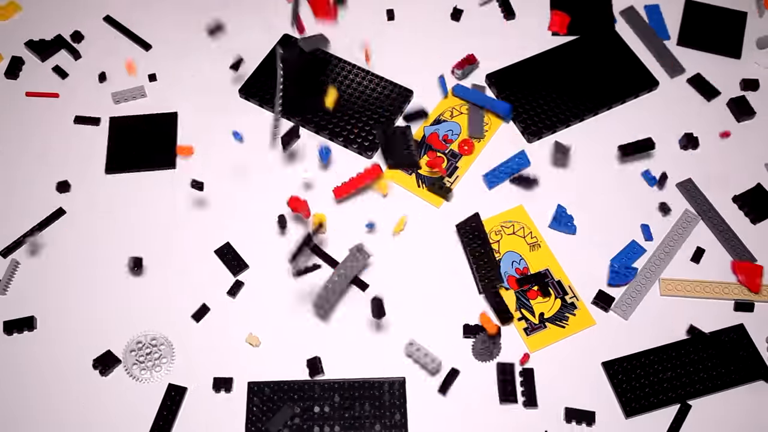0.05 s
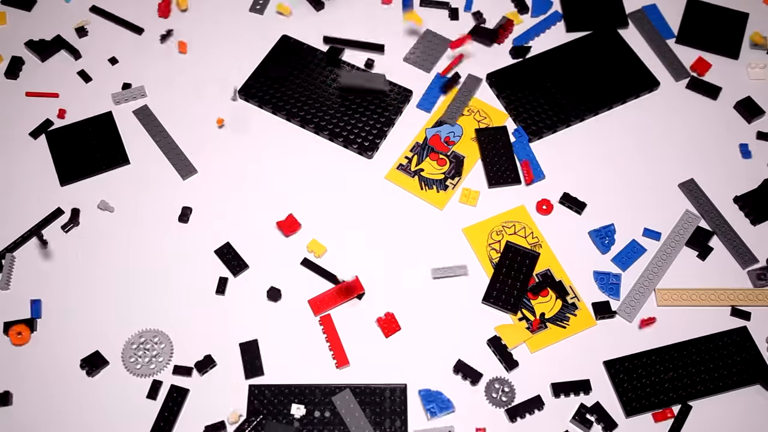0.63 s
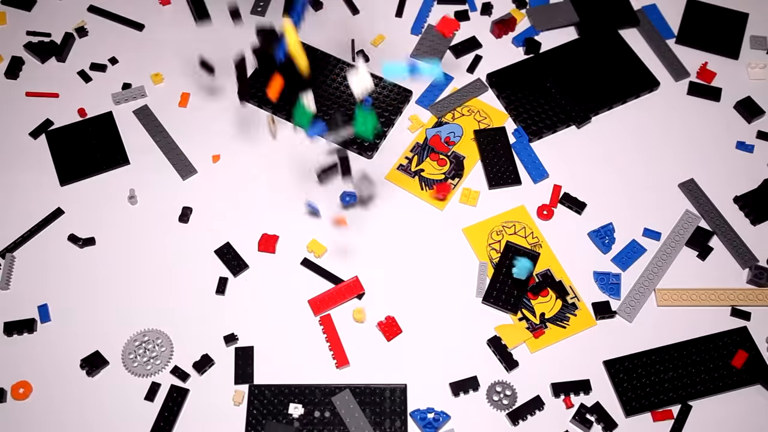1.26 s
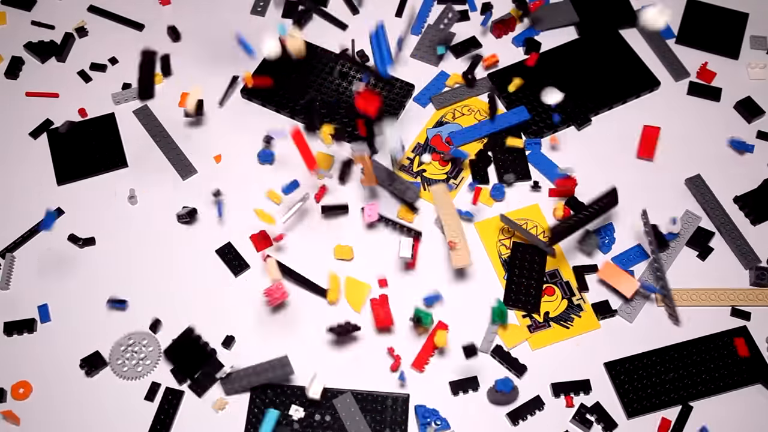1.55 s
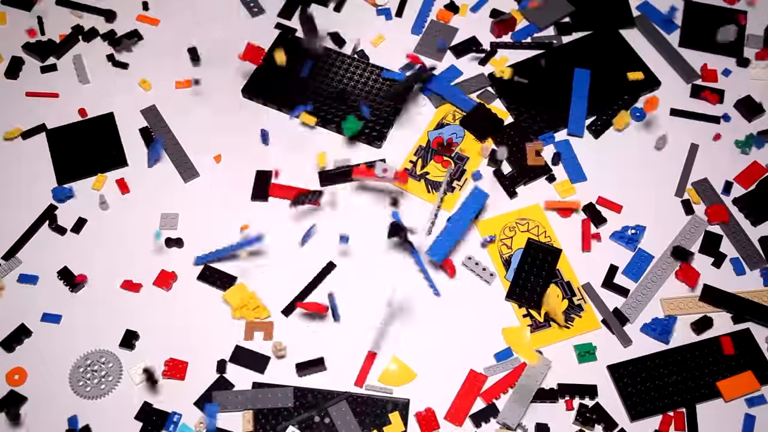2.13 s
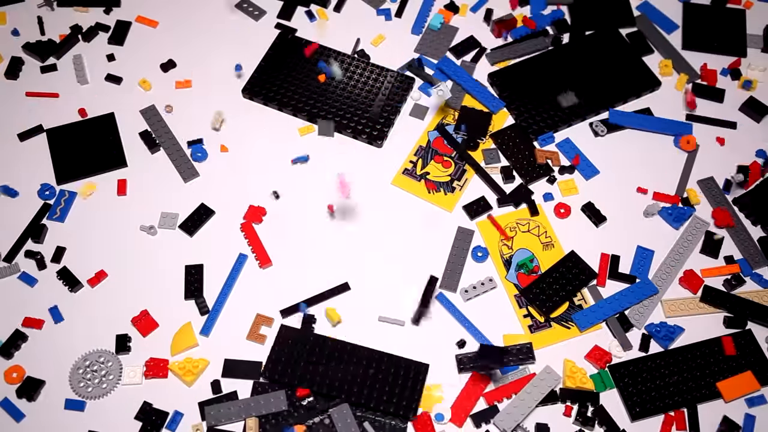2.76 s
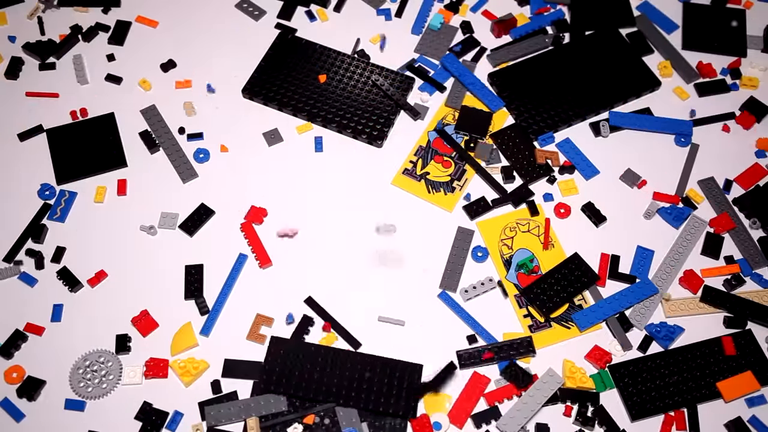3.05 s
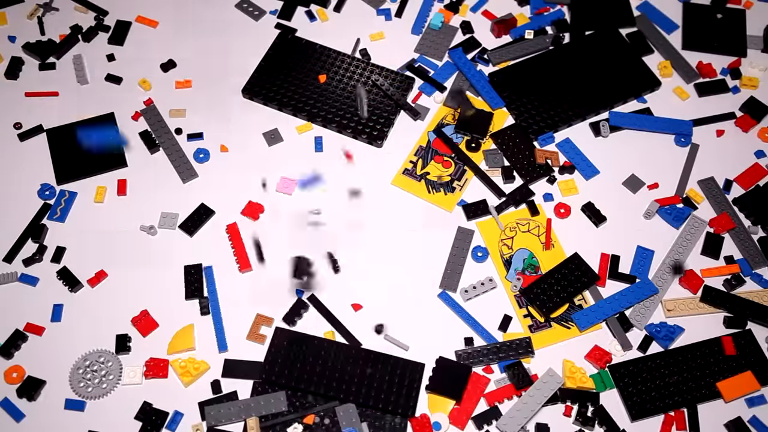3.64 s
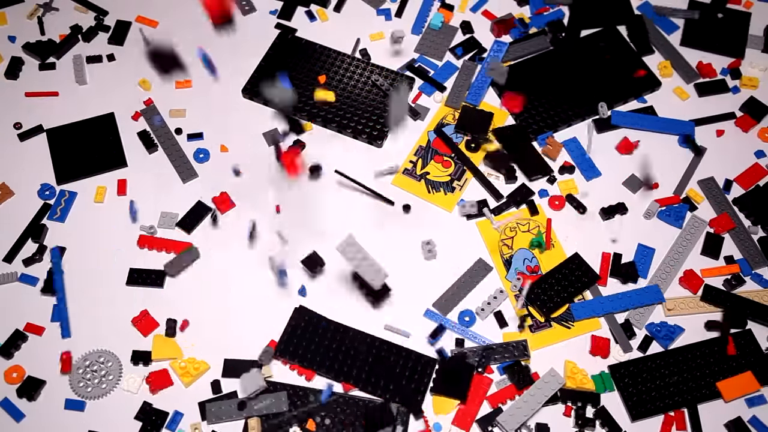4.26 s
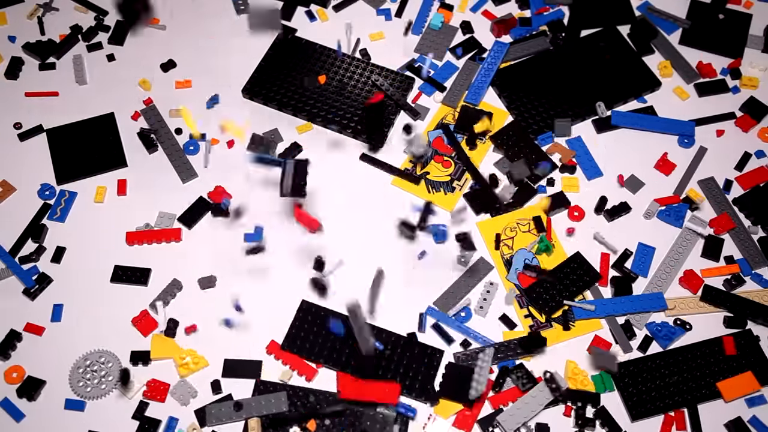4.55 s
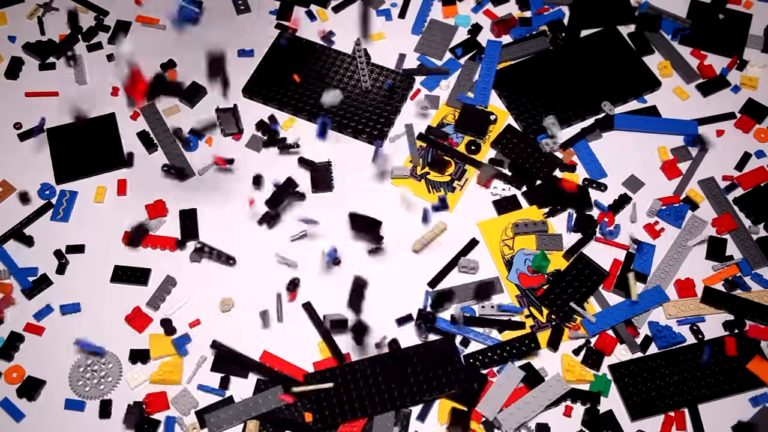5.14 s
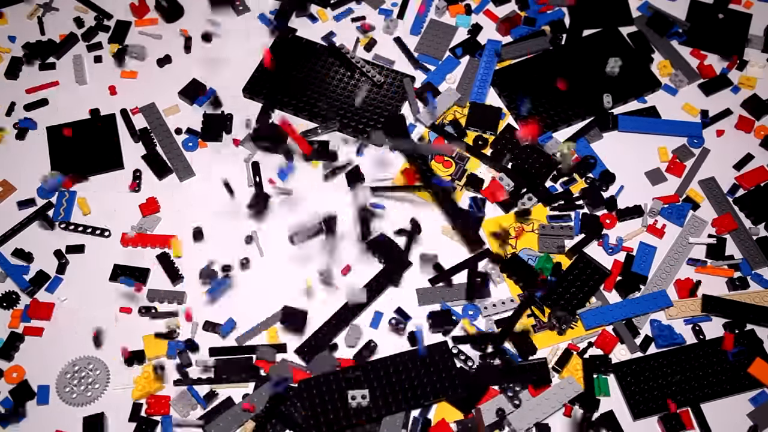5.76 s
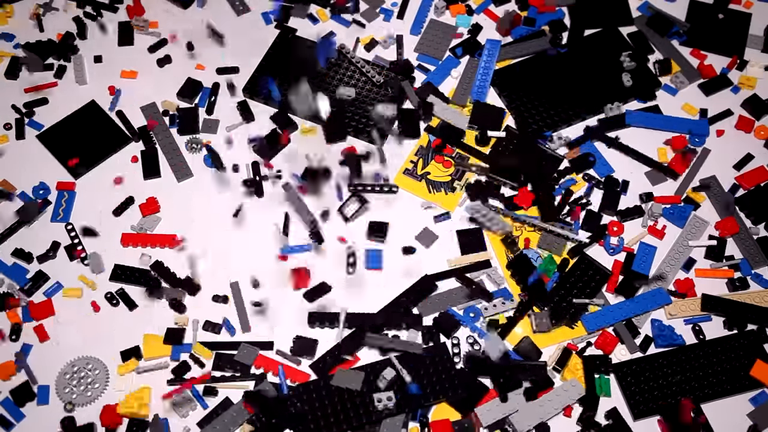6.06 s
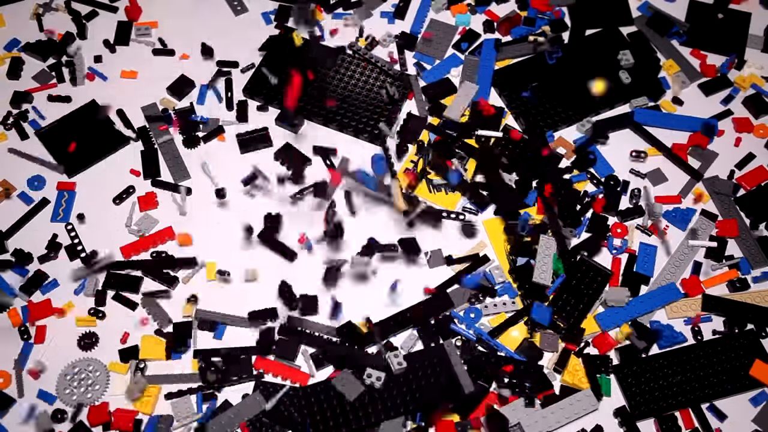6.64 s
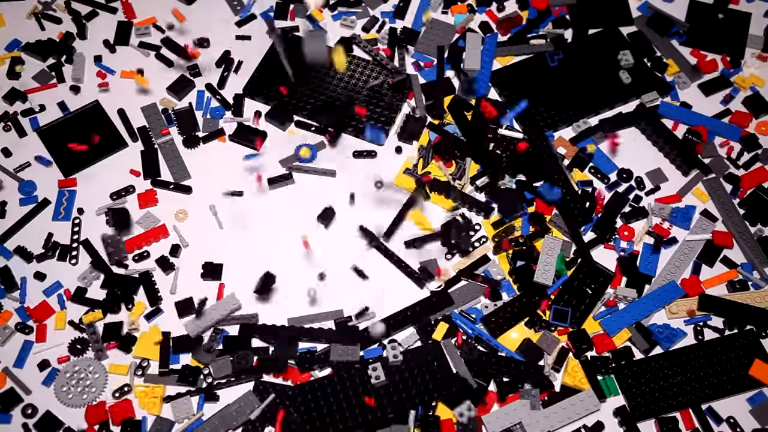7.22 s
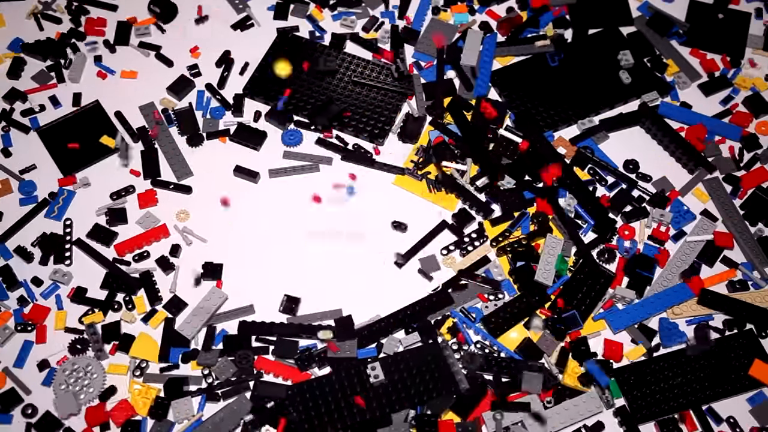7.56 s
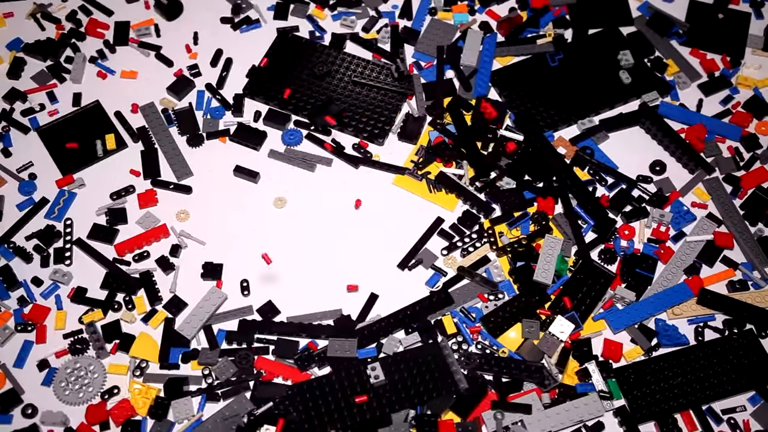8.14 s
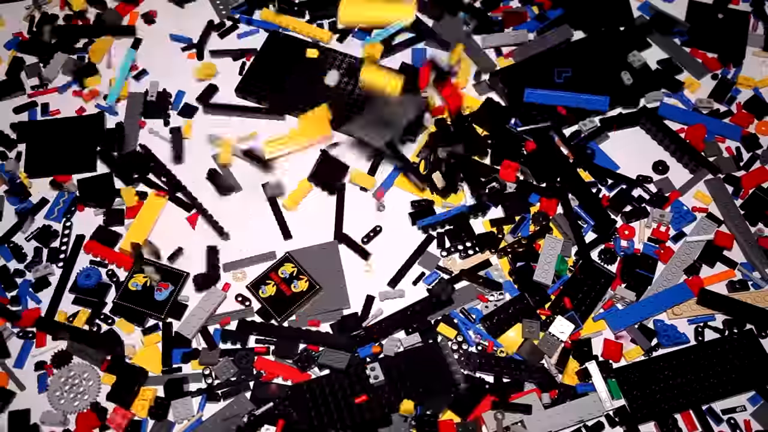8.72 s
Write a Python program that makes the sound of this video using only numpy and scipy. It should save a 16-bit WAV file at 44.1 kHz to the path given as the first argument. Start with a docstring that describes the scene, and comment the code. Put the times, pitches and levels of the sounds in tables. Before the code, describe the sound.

Four pours of loose plastic building bricks hit a tabletop, heard up close with a little small-room echo. The first is brief, followed by a soft slide of bricks in a tub. The second starts suddenly and trails off into single clicks. The third grows from a trickle into a long, dense clatter and dies down. The fourth is short and loud. Sharp pings and hollow knocks from larger plates stand out throughout.

```python
"""Loose plastic toy bricks are tipped onto a table in four pours, close by, in a small room.
A short pour opens: pieces click and tap, big plates knock; the taps set off table top ring and
a low room hum. At 0.8 s bricks slide in their tub, further off. The second pour follows at 1.3 s,
and a few pieces bounce on the spot. The third builds slowly from 3.5 s, sags and settles after
7.2 s. A last brief, loud pour lands at 8.2 s."""
import sys
import numpy as np
from scipy import signal
from scipy.fft import rfft, irfft, next_fast_len
from scipy.io import wavfile

SR = 44100
rng = np.random.default_rng(int(sys.argv[2]) if len(sys.argv) > 2 else 0)


def file_out(sig):
    """Save sig as 16-bit WAV at sys.argv[1]."""
    # one column per channel
    cols = np.atleast_2d(sig).T
    # limit, then scale
    lim = np.clip(cols, -1, 1)
    pcm = np.round(lim * 32767).astype(np.int16)
    wavfile.write(sys.argv[1], SR, pcm)


N = 387638
T = np.arange(3072) / SR  # life of one contact [s]


def amp(db):
    """Decibels to gain."""
    return 10 ** (np.asarray(db) / 20)


def norm(x):
    """Scale to unit energy."""
    return x / np.sqrt(np.sum(x ** 2) + 1e-20)


def along(points, hz):
    """Interpolate (frequency, value) points on a log axis."""
    freqs, values = np.transpose(points)
    return np.interp(np.log(hz + 1), np.log(freqs + 1), values)


def filtered(x, gain):
    """Apply a frequency-dependent gain."""
    size = next_fast_len(len(x) + 1024)
    return irfft(rfft(x, size) * gain(np.fft.rfftfreq(size, 1 / SR)), size)[:len(x)]


def add(track, time_s, sound):
    """Mix a sound into the track."""
    part = track[max(0, round(time_s * SR)):][:len(sound)]
    part += sound[:len(part)]


def burst(hz, octaves, t60_s):
    """Crowded modes around hz, struck together and decaying; unit energy."""
    band = lambda f: np.exp(-.5 * (np.log2((f + 1) / hz) / octaves) ** 2)
    return norm(filtered(rng.standard_normal(len(T)), band) * amp(-60 * T / t60_s))


def swell(peak_s):
    """Contact envelope: one corner touches, the others follow."""
    return (T / peak_s * np.exp(1 - T / peak_s)) ** 2


# still room air: (frequency [Hz], spectral level [dB])
AIR_SPECTRUM = [(25, -42), (90, 3), (300, -21), (1000, 2), (5000, -6), (15800, -20)]
def air(rms_db=-60):
    """Faint steady room noise."""
    noise = filtered(rng.standard_normal(N), lambda f: amp(along(AIR_SPECTRUM, f)))
    return amp(rms_db) * np.sqrt(N) * norm(noise)


def brick(hz, settle_s, crack_db, others_db=-8, tail_db=-19, tick_db=-11, purer_db_per_oct=5, count=5):
    """One piece lands: a tick, then its modes and a crack swell together; a faint ring remains."""
    other_hz = np.minimum(hz * 2 ** rng.uniform(-1.2, .8, count), rng.uniform(11000, 15500, count))
    modes_hz = np.r_[hz, other_hz][:, None]
    modes_db = np.r_[0, rng.normal(others_db, 4, count)][:, None]
    phases = rng.random((count + 1, 1))
    ring = np.sum(amp(modes_db) * np.sin(2 * np.pi * (modes_hz * T + phases)), axis=0)
    chatter = swell(settle_s * np.exp(rng.normal(0, .2)))
    tail = amp(-60 * T / .045) * (1 - np.exp(-T / settle_s))
    envelope = chatter + amp(tail_db) * tail
    crack = norm(burst(hz * 1.11, octaves=0.99, t60_s=0.6) * envelope)
    tick = burst(hz, octaves=0.9, t60_s=0.00081)
    # small, high pieces ping; big ones mostly crack
    crack_gain = amp(crack_db - purer_db_per_oct * np.log2(hz / 8000))
    return norm(norm(ring * envelope) + crack_gain * crack + amp(tick_db) * tick)


def tap(hz, rattle_db=-2, rattle_t60_s=0.02):
    """The table top gives under a piece: a push of a cycle or two and a short woody rattle."""
    push = np.sin(2 * np.pi * hz * T) * amp(-14 * T * hz)
    rattle = burst(hz * 1.7, octaves=0.71, t60_s=rattle_t60_s)
    return norm(norm(push) + amp(rattle_db) * rattle)


def flow(now_s, start_s, rise_s, empty_s, db, sag_db_per_s, patter_db, settle_db_per_s=25.5):
    """Gains of one pour: it builds as the tub tips, sags as it drains, settles once it is empty."""
    pouring_s = np.clip(now_s, start_s, empty_s) - start_s
    settling_s = np.maximum(now_s - empty_s, 0)
    tipped = 1 - np.exp(-pouring_s / rise_s)
    level = amp(db - sag_db_per_s * pouring_s - settle_db_per_s * settling_s)
    clatter = level * tipped ** 1.3  # needs pieces to collide, so builds later
    patter = level * tipped * amp(patter_db - 2 * settling_s)  # hops get lower, so fades faster
    return clatter, patter


# brick-on-brick colour: (frequency [Hz], gain [dB])
CLATTER_SPECTRUM = [(300, -14), (900, 0.5), (1800, -5), (3400, 1), (4700, -1), (7100, 0.5), (12300, -4.5),
                    (15800, -6.5)]
# tips of the tub: (start [s], rise [s], empty [s], level [dB], sag [dB/s], patter re clatter [dB])
TUB_TIPS = [(0, 0.00067, 0.36, -19, 10, -8.5), (1.279, 0.021, 2.488, -14, 5.5, -13),
            (3.48, 0.96, 7.24, -14.5, 1.5, -13.5), (8.233, 0.056, 8.45, -10.5, 1, -15.5)]
def pours(busy_per_s=1100, trickle_per_s=60, scatter_db=3, clump_db=3.5, clumps_per_s=55, count=500):
    """Streams of assorted pieces, denser when louder. Returns clicks and table taps."""
    pieces = [brick(hz, settle_s=0.0015, crack_db=-0.5) for hz in rng.uniform(1317, 15300, count)]
    pieces = [norm(filtered(p, lambda f: amp(along(CLATTER_SPECTRUM, f)))) for p in pieces]
    thumps = [tap(hz) for hz in 850 * np.exp(rng.normal(0, 0.41, count))]
    clicks, taps, now_s = np.zeros(N), np.zeros(N), np.arange(N) / SR
    # pieces leave in clumps; most touch lightly, a few hit hard
    bunching_db = clump_db * np.interp(now_s * clumps_per_s, np.arange(N), rng.standard_normal(N))
    chance = rng.random(N)
    hardness_db = np.minimum(scatter_db * rng.exponential(size=N), 14)
    choices = rng.integers(count, size=(N, 2))
    clatter, patter = np.max([flow(now_s, *pour) for pour in TUB_TIPS], axis=0)
    hits_per_s = trickle_per_s + busy_per_s * (clatter / amp(-20)) ** .65
    hits = np.flatnonzero(chance < hits_per_s / SR)
    sizes = amp(hardness_db[hits] + bunching_db[hits])
    sizes *= np.sqrt(SR / hits_per_s[hits] / np.mean(sizes ** 2))  # unit power at any density
    for i, size in zip(hits, sizes):
        piece, spot = choices[i]
        polarity = (-1) ** spot
        add(clicks, now_s[i], size * clatter[i] * amp(-0.5) * pieces[piece])
        add(taps, now_s[i], polarity * size * patter[i] * amp(1) * thumps[spot])
    return clicks, taps


# low room hum (first two rows) and table top ring: (frequency [Hz], level [dB], t60 [s])
HUM_AND_RING = [(81.5, -53.5, 0.89), (151.7, -38, 0.32), (189.6, -39.5, 0.15), (249.5, -27.5, 0.091),
                (362, -57, 1), (420, -56, 0.16), (498.6, -37, 0.26), (543.5, -31.5, 0.1), (1200, -62, 0.04)]
def table_and_hum(taps, ring_db=-20, low_cut_hz=215):
    """Taps, thin in deep bass, set off a low room hum and the table top's ring."""
    t = np.arange(SR) / SR
    ring = sum(amp(db - 60 * t / t60_s) * np.sin(2 * np.pi * hz * t) for hz, db, t60_s in HUM_AND_RING)
    direct = signal.sosfilt(signal.butter(2, low_cut_hz, "high", fs=SR, output="sos"), taps)
    return direct + amp(ring_db) * signal.fftconvolve(taps, ring)[:N]


# single pieces that stand out: (time [s], ring level [dB], ring pitch [Hz], clack level [dB])
HARD_LANDINGS = [(0.0034, 2, 7940, -15), (0.0168, -8, 3440, -15), (0.1221, -3, 4270, -25),
                 (0.1354, -6, 3290, -20), (0.2169, -11, 10690, -24), (0.3606, -7.5, 4020, -23),
                 (0.4115, 2, 8970, -14.5), (0.4603, -6, 7570, -29), (0.6546, -2, 11300, -32),
                 (0.6599, 1, 8170, -25), (0.6744, -2.5, 4270, -27), (0.7372, 2.5, 12650, -27),
                 (0.9238, -5, 11940, -35), (1.2825, -5, 4230, -27), (1.3279, 2.5, 7800, -14),
                 (1.3468, -3, 9180, -20), (1.4551, 2.5, 10800, -22), (1.4674, 2, 11100, -26),
                 (2.1186, 1, 7350, -17), (2.138, 3.5, 7000, -12.5), (2.4423, -4, 5650, -28),
                 (2.5531, -3, 10540, -21), (2.6479, 1, 11200, -28), (2.799, -12, 8740, -18.5),
                 (2.8424, -11, 9260, -27), (2.8609, -12, 6870, -25), (3.0959, -15, 10200, -39),
                 (3.1224, -23, 10300, -36), (3.1732, -17.5, 5530, -31), (3.254, -15, 7040, -37),
                 (3.3103, -21, 11500, -48), (3.443, -23, 4900, -34), (3.4875, -12, 5800, -23),
                 (3.4955, -10.5, 6200, -26), (3.6022, -14, 3260, -22), (3.6217, -13, 9800, -23),
                 (3.6396, -7, 8320, -24), (3.69, -7.5, 4440, -19), (3.7983, -4, 8380, -14),
                 (3.8152, 0.5, 9140, -9), (3.8686, 1.5, 11630, -10), (3.9255, -4, 3420, -25),
                 (4.0302, -7, 4520, -19), (4.1305, -2.5, 10700, -17), (4.2261, -3, 12100, -16.5),
                 (4.3834, -1, 7340, -20), (4.4059, -3, 12100, -27), (4.5095, -3.5, 4050, -15),
                 (4.595, 0, 4050, -17), (4.688, -4, 3420, -21), (4.7027, -3, 11500, -16),
                 (4.7538, -3.5, 2980, -16), (4.9506, -4, 4010, -12), (4.9771, 4, 7830, -14),
                 (5.0235, 1, 6100, -16), (5.0559, -2, 7650, -16), (5.2859, -1, 7900, -22),
                 (5.3048, 5, 6480, -14.5), (5.3552, 3.5, 8480, -25), (5.5672, -4, 7880, -13),
                 (5.658, 5.5, 10200, -10.5), (5.7798, -1, 3390, -12), (5.8227, 7.5, 7390, -16),
                 (6.0472, 2.5, 11050, -15), (6.2103, -5.5, 3700, -19), (6.2492, 3.5, 7630, -21),
                 (6.387, 1.5, 8080, -30), (6.4548, -3, 4650, -27), (6.5301, 2.5, 6100, -8.5),
                 (6.8109, -4.5, 3250, -14), (6.9945, 1.5, 8100, -30), (7.0948, 1, 13350, -16),
                 (7.1876, -3, 15400, -37), (7.3522, -3, 11000, -28), (7.3711, 3, 11240, -21),
                 (7.7199, -13.5, 4500, -33), (8.0396, -18, 6080, -38), (8.115, -22.5, 4290, -45),
                 (8.2392, 0, 4960, -18), (8.2811, 6, 7400, -11), (8.316, 0, 12490, -18),
                 (8.3444, -1, 6880, -23), (8.4452, 1, 6600, -28), (8.6797, 3.5, 6980, -31),
                 (8.751, 5.5, 5660, -13)]
def landings(ring_gain_db=12.5, clack_gain_db=20, clack_hz=2500, lead_s=.0008):
    """Pieces fall hard and near: a bright ring over a duller clack."""
    out = np.zeros(N)
    clack_rise = 1 - np.exp(-T / .0025)
    for time_s, ring_db, hz, clack_db in HARD_LANDINGS:
        ring = brick(hz, settle_s=0.0022, crack_db=0)
        clack = norm(burst(clack_hz, octaves=1.0, t60_s=0.05) * clack_rise)
        add(out, time_s - lead_s, amp(ring_db + ring_gain_db) * ring)
        add(out, time_s - lead_s, amp(clack_db + clack_gain_db) * clack)
    return out


# heavy pieces: (time [s], level [dB], pitch [Hz], thud level [dB], clack level [dB])
PLATE_KNOCKS = [(0.177, -16, 775, -43, -22), (0.296, -5.5, 570, -29, -9.5), (0.31, -20, 533, -30, -27),
                (0.525, -10.5, 560, -34, -28), (0.837, -25, 713, -47, -18), (0.867, -21, 670, -47, -19.5),
                (1.395, -15, 1230, -52, -11), (1.518, -14, 1110, -41, -7), (1.622, -8, 853, -34, -10),
                (1.694, -12, 1280, -33, -12), (2.229, -17.5, 840, -44, -19), (2.312, -8.5, 1000, -25, -5.5),
                (2.481, -12, 484, -31, -13), (2.561, -15, 972, -32, -11), (2.71, -11, 890, -28, -17),
                (2.888, -21, 524, -39, -17), (3.495, -22, 490, -38.5, -21), (3.64, -21, 490, -37, -20.5),
                (4.51, -16.5, 1200, -40, -18), (5.134, -12, 700, -21, -16), (5.339, -14, 530, -37, -18),
                (5.536, -12, 1110, -45, -23), (5.631, -13, 1400, -34, -11.5), (5.698, -16, 510, -38, -13),
                (6.204, -15.5, 476, -39, -17), (6.499, -12.5, 570, -35, -13), (6.55, -14.5, 1350, -33, -15),
                (6.651, -12, 484, -32, -16), (6.935, -15.5, 1010, -39, -19), (7.443, -16, 800, -40, -26),
                (7.506, -23, 797, -44, -24), (7.574, -18, 1030, -39, -19.5), (8.531, -5, 706, -21.5, -7.5),
                (8.585, -11, 657, -28, -24), (8.716, -6.5, 530, -33, -8)]
def knocks(clack_hz=1700, thud_hz=300, hollow_hz=560, slap_delay_s=.001):
    """Big plates and beams: an edge clacks, the piece slaps down in one stiff push and rings hollow."""
    out = np.zeros(N)
    push = lambda hz, cycles: norm(np.sin(2 * np.pi * hz * T) * swell(cycles / hz))
    for time_s, db, hz, thud_db, clack_db in PLATE_KNOCKS:
        clack = amp(clack_db + 17) * burst(clack_hz, octaves=1.0, t60_s=0.065)
        slap = amp(db + 15) * push(hz, cycles=0.83)
        thud = amp(thud_db + 27) * push(thud_hz, cycles=0.42)
        hollow = amp(db + 12) * burst(hollow_hz, octaves=0.43, t60_s=0.053)
        add(out, time_s, clack)
        add(out, time_s + slap_delay_s, slap + thud + hollow)
    return out


# rustle in the tub: (frequency [Hz], spectral level [dB])
TUB_SPECTRUM = [(60, -28), (300, -14.5), (750, -6.5), (1300, -3.5), (1800, -7), (3000, -5), (6500, -6),
                (10000, -10), (15800, -18)]
# slide envelope: (time [s], level [dB])
SLIDE_LEVELS = [(0.8, -40), (0.924, -26), (1.3, -24.5)]
def tub_slide(gain_db=-2, contacts_per_s=1500, contact_t60_s=0.028):
    """Bricks slide over each other in the tilted tub: a dense, dull rustle of small contacts."""
    contacts = (rng.random(N) < contacts_per_s / SR) * rng.standard_normal(N) ** 2
    energy = np.abs(signal.fftconvolve(contacts, amp(-60 * T / contact_t60_s) ** 2)[:N])
    grains = np.sqrt(energy) * rng.standard_normal(N)
    rustle = norm(filtered(grains, lambda f: amp(along(TUB_SPECTRUM, f)))) * np.sqrt(N)
    times_s, levels_db = np.transpose(SLIDE_LEVELS)
    envelope_db = np.interp(np.arange(N) / SR, times_s, levels_db, left=-120, right=-120)
    return rustle * amp(envelope_db + gain_db)


# pieces rocking on the spot: (start [s], end [s], pitch [Hz], level [dB])
ROCKING_PIECES = [(1.763, 1.853, 5240, -5.5), (2.486, 2.58, 11000, -10), (2.64, 2.76, 11050, -19),
                  (5.674, 5.72, 7230, -1.5), (7.354, 7.46, 11200, -21), (7.54, 7.72, 11200, -24)]
def rockers(gain_db=13, mean_gap_s=0.019, max_hops=16):
    """A piece bounces unevenly on one note; longer hops land harder."""
    out = np.zeros(N)
    for start_s, end_s, hz, db in ROCKING_PIECES:
        hops = rng.uniform(.6, 1.4, max_hops)
        times_s = start_s + mean_gap_s * (np.cumsum(hops) - hops[0])
        for time_s, hop in zip(times_s[times_s <= end_s], hops):
            ping = brick(hz, settle_s=0.0017, crack_db=2, others_db=-34, tail_db=-11)
            add(out, time_s, amp(db + gain_db) * np.sqrt(hop) * ping)
    return out


# room decay: (frequency [Hz], t60 [s])
ROOM_DECAY = [(100, 0.092), (500, 0.43), (1500, 0.9), (4000, 1), (9000, 0.34), (16000, 0.13)]
def room(x, tail_db=-10, early_db=-10, early_t60_s=0.072, delay_s=.004, crossfade_s=.015, count=8):
    """Near surfaces answer first, the mids ring longest; each spot on the table has its own echoes."""
    out = np.zeros(N)
    steps = np.arange(N) / SR / crossfade_s
    spots = rng.integers(count, size=N)
    for spot in range(count):
        hz, t, spectra = signal.stft(rng.standard_normal(SR), SR, nperseg=256)
        decay = amp(-60 * t / along(ROOM_DECAY, hz)[:, None])
        tail = signal.istft(spectra * decay, SR, nperseg=256)[1]
        early = rng.standard_normal(len(tail)) * amp(-60 * np.arange(len(tail)) / SR / early_t60_s)
        response = amp(tail_db) * norm(tail) + amp(early_db) * norm(early)
        share = np.sin(np.pi / 2 * np.interp(steps, np.arange(N), spots == spot))
        add(out, delay_s, signal.fftconvolve(x * share, response))
    return out


def scene():
    """Bricks, table and tub in the room."""
    clicks, taps = pours()
    sources = clicks + landings() + rockers() + table_and_hum(taps + knocks()) + tub_slide()
    return (sources + room(sources) + air())[None]


def record(dry, ceiling=1.05, low_cut_hz=71, high_cut_hz=15900):
    """Soft-clip the sharpest clicks, then band-limit."""
    rounded = dry[0] / (1 + np.abs(dry[0] / ceiling) ** 6) ** (1 / 6)
    thinned = signal.sosfilt(signal.butter(5, low_cut_hz, "high", fs=SR, output="sos"), rounded)
    return filtered(thinned, lambda hz: hz < high_cut_hz)[None]


dry = scene()
out = record(dry)
file_out(out)
```